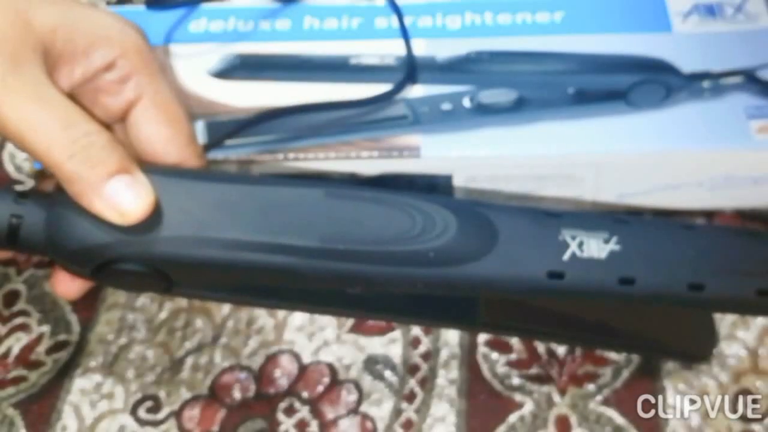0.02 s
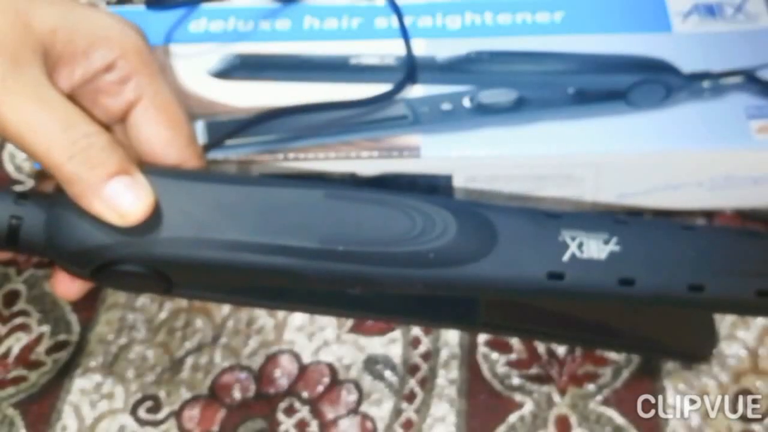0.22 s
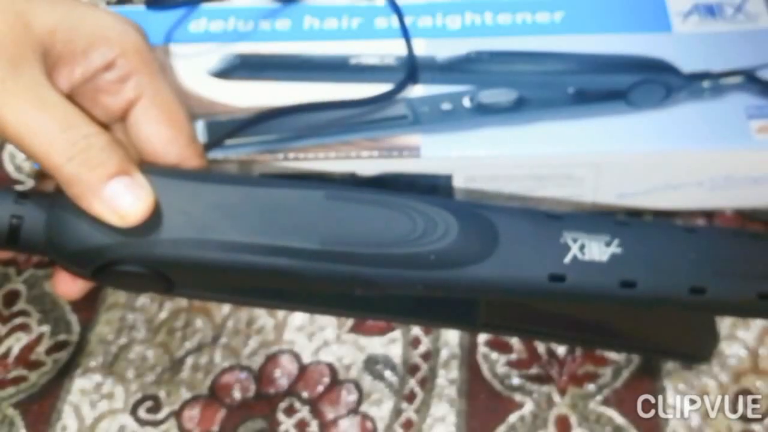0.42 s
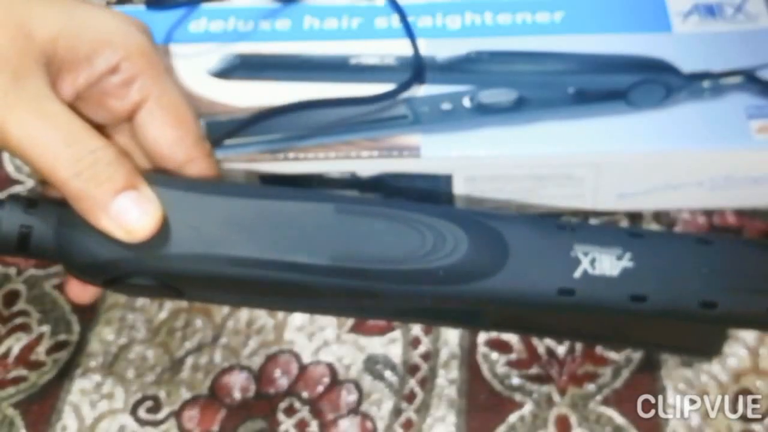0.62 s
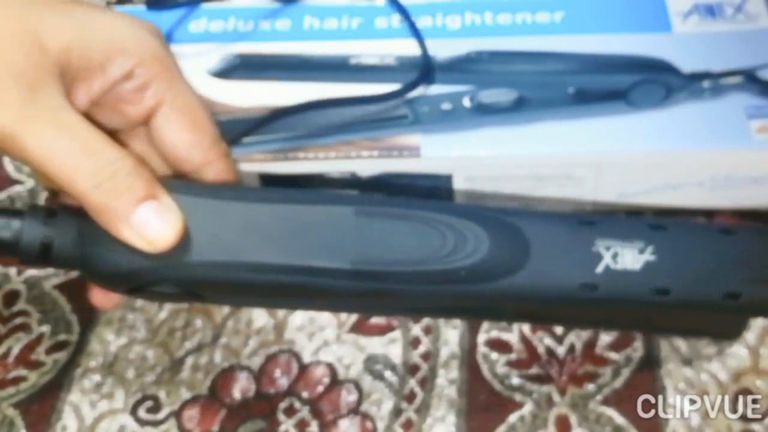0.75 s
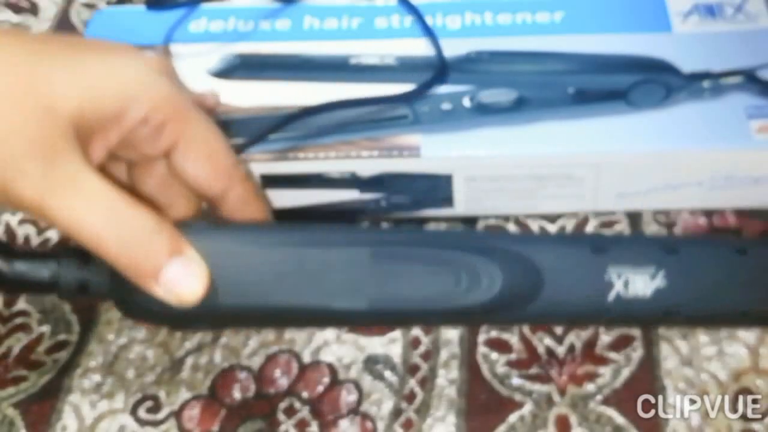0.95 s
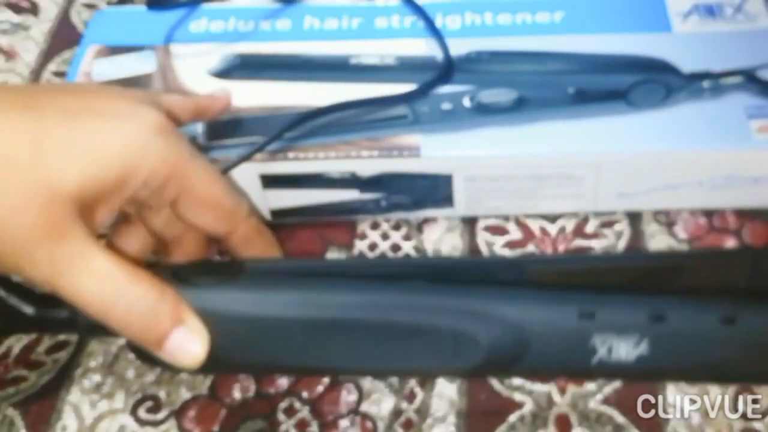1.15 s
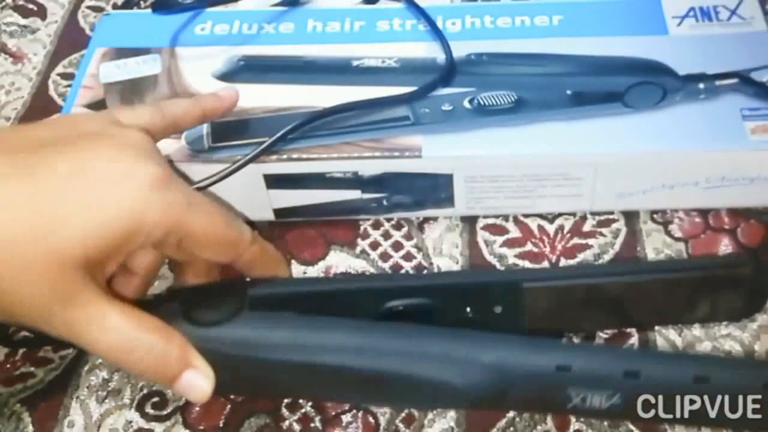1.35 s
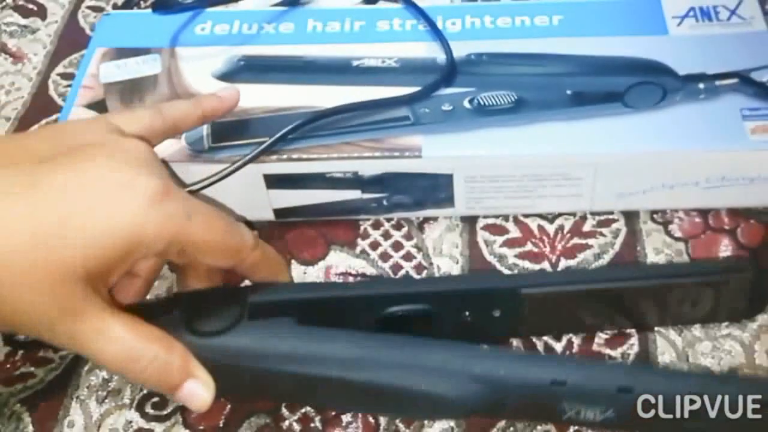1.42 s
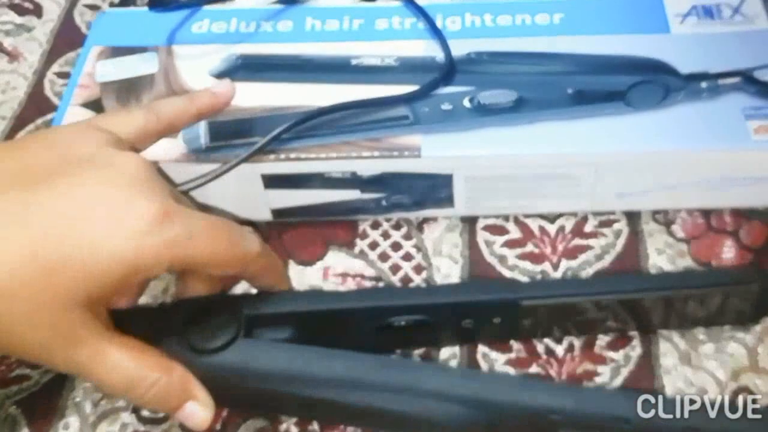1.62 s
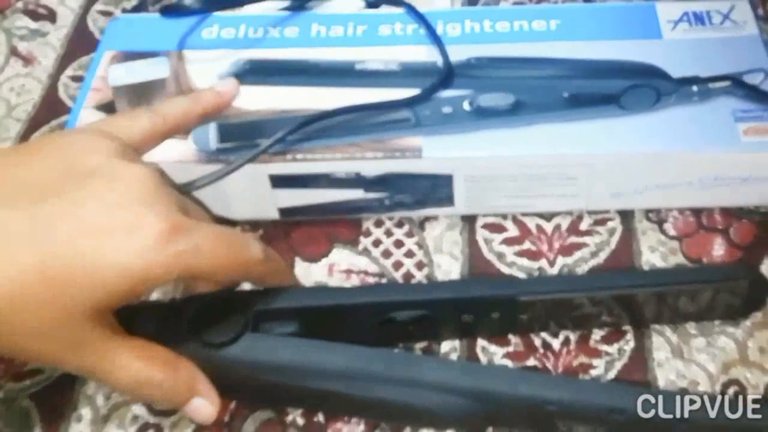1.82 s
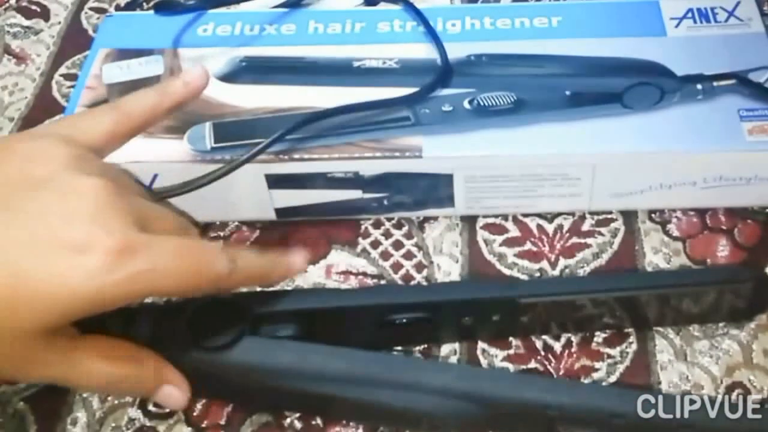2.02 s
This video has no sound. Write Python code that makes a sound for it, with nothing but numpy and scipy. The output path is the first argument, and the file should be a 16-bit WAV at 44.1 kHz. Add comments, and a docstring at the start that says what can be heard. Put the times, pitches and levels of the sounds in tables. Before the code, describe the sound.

A plastic hair straightener's catch snaps once, sharp and close, with a brief room echo. Very faint rubbing follows as the arms open, then a soft brush of fingers, over steady low rumble and hiss.

```python
"""A plastic hair straightener is handled close by in a quiet room with steady rumble and hiss.
First its hinge ticks softly, then the catch snaps once and chatters against the hollow shell.
The shell rattles briefly, then the walls answer with small echoes over a short fading tail.
Next the arms open with a faint rub while a low drone swells and fades.
Last, fingers brush softly off the casing."""
import sys
import numpy as np
from scipy import signal
from scipy.fft import rfft, irfft
from scipy.io import wavfile

SR = 44100
rng = np.random.default_rng(int(sys.argv[2]) if len(sys.argv) > 2 else 0)


def master_out(mix):
    """Clip the mix to full scale and print it as 16-bit PCM to the path in sys.argv[1]."""
    frames = np.transpose(np.atleast_2d(mix))
    ceiling = np.clip(frames, -1, 1)
    pcm = np.round(ceiling * 32767).astype(np.int16)
    wavfile.write(sys.argv[1], SR, pcm)


N = 92610

# Levels in the tables are relative. t60 is the time a sound takes to fade by 60 dB.
# the knocks that make up the snap: t/s, catch level/dB, shell level/dB
KNOCKS = [(0.244693, 6.9, -4.6), (0.24551, -12.6, -2.3), (0.246216, -14.6, -3.7), (0.247871, -36.7, -20.8)]
# ringing tones of the small stiff catch: f/Hz, level/dB, t60/s
CATCH_TONES = [(4136, -10.9, .003), (8500, 9.3, .0021), (9152, -16.7, .0054)]
# ringing tones of the hollow shell: f/Hz, level/dB, t60/s
SHELL_TONES = [(839, -44.3, .044), (968, -47.6, .018), (1143, -44.5, .02), (1302, -54.6, .065),
               (1688, -43.3, .012), (2041, -44.6, .024), (2492, -47.2, .0087), (3565, -37.2, .028),
               (5979, -44.5, .033), (6045, -45.1, .0056), (7583, -35.9, .014), (8212, -43.9, .032),
               (9866, -31, .0055), (11255, -19.2, .004), (11672, -17.2, .0128), (12240, -39.1, .018),
               (13373, -25.7, .0028), (14576, -27.8, .0022)]
# how much louder the snap is on the left: f/Hz, left minus right level/dB
SNAP_BALANCE = [(740, -4.5), (1220, -2.5), (2000, -3), (3300, 0), (5500, -1), (8800, .6), (11000, .2),
                (13000, -3.5), (15000, -1.5)]
# how far the snap's left side runs ahead of its right: f/Hz, phase/rad
SNAP_LEAD = [(1400, 0), (3200, -.2), (5400, .2), (6500, -.1), (10000, .08), (13000, -.15)]
# ringing tones of the hinge: f/Hz, level/dB, t60/s
HINGE_TONES = [(1230, -3, 0.026), (3430, 0, 0.021), (5880, -1, 0.01993), (6780, -0.5, 0.012),
               (7180, 1, 0.013), (9300, -13, .03)]
# loudness of the rub over time: t/s, lower band level/dB, upper band level/dB
RUB_LEVELS = [(.58, -96.5, -100), (.79, -85, -88), (.9, -90, -79), (1.03, -91, -81.5), (1.09, -89, -86.5),
              (1.17, -89, -82), (1.24, -89, -89), (1.39, -79, -84), (1.46, -101, -103)]
# the two bands where the rub rings: f/Hz, width/Hz
RUB_BANDS = [(2820, 74), (3120, 220)]
# tone colour of the brushing fingers: f/Hz, level/dB
FINGER_COLOUR = [(800, -16.5), (2000, 9), (2800, -4), (6000, -5), (8500, 3), (14000, -18)]
# stereo width of the brushing fingers: f/Hz, side minus mid level/dB
FINGER_WIDTH = [(700, -5.5), (4000, -11), (10000, -10)]
# a brief, soft shell rattle (first row), then early echoes off the walls: delay/s, spread/s, level/dB
RATTLE_AND_ECHOES = [(.008, .005, -50), (.0195, .003, -48), (.027, .0011, -40), (.0292, .0022, -40)]
# tone colour of the rattle and echoes: f/Hz, level/dB
RATTLE_ECHO_COLOUR = [(300, -15.5), (2000, -1), (2700, -33.5), (3350, -1), (4300, 0), (5000, -12),
                      (6300, 0.5), (8800, -4.5), (10000, 5.5), (11200, 4), (12500, -5.5), (15000, -7)]
# tone colour of the room's tail: f/Hz, level/dB
TAIL_COLOUR = [(300, -7.5), (800, 1), (1300, -1), (2000, 1), (2700, -20), (3450, 4), (4400, -1.5),
               (5400, -3), (6100, 5.5), (6800, -1.5), (8800, 4), (10600, -4), (11150, 13), (11850, 7),
               (12300, 2), (15000, -2.5)]
# how long the tail takes to fade: f/Hz, t60/s
TAIL_FADE = [(1000, 0.2), (3500, 0.22), (7000, 0.25), (11500, 0.2293), (15000, 0.13)]
# stereo width of the rattle, echoes and tail: f/Hz, side minus mid level/dB
AFTER_SNAP_WIDTH = [(1000, -6.5), (2400, -13.5), (4400, -5.5), (8000, -1), (15000, -3.5)]
# loudness of the low drone over time: t/s, level/dB
DRONE_SWELL = [(.45, -71.5), (.65, -61), (1.45, -56), (1.7, -69)]
# tone colour of the steady rumble and hiss: f/Hz, level/dB
BACKGROUND_COLOUR = [(20, -11.5), (33, -1.5), (43, -3.5), (59, 1.5), (77, -6.5), (110, -2.5), (165, -11),
                     (230, -11.5), (290, -14), (380, -18), (620, -16.5), (1030, -20.5), (1400, -28.5),
                     (2000, -32.5), (2500, -36.5), (4200, -39), (6400, -40), (7200, -37), (10000, -41),
                     (13000, -43), (14700, -48), (15300, -60)]
# stereo width of the rumble and hiss: f/Hz, side minus mid level/dB
BACKGROUND_WIDTH = [(25, -30.5), (60, -38.5), (110, -53), (200, -32.5), (380, -23.5), (700, -25.5),
                    (1300, -19), (2400, -13.5), (4400, -9), (8000, -7), (15000, -5.5)]

SNAP_S = KNOCKS[0][0]
TIME = np.arange(N) / SR  # seconds at each sample
FREQS = np.fft.rfftfreq(N, 1 / SR)  # Hz at each point of a spectrum


def catch_snap():
    """The catch snaps and chatters: each knock sets both the catch and the shell ringing."""
    snap = np.zeros(N)
    for start_s, catch_db, shell_db in KNOCKS:
        snap += gain(catch_db) * ring(CATCH_TONES, start_s, rise_s=.00207)
        snap += gain(shell_db) * ring(SHELL_TONES, start_s, rise_s=.00005)
    # the hollow shell gives off less sound in one narrow band
    dip_hz, dip_half_width_hz, dip_db = 5300, 260, -9
    hollow = gain(dip_db * bell_curve(FREQS, dip_hz, dip_half_width_hz))
    # left and right each take half of the lean and the lead, in opposite directions
    lean_db = look_up(SNAP_BALANCE, FREQS) / 2
    lead = look_up(SNAP_LEAD, FREQS) / 2
    stereo = gain([lean_db, -lean_db]) * np.exp(1j * np.array([lead, -lead]))
    return irfft(rfft(snap) * hollow * stereo, N)


def hinge_tick():
    """The hinge takes up its slack and rings softly just before the snap."""
    return gain(db=-47) * ring(HINGE_TONES, start_s=.2277, rise_s=.0013)


def arm_rub():
    """Faint friction rings in two narrow bands while the arms swing open."""
    times, *band_levels = np.transpose(RUB_LEVELS)
    return sum(noise_band(hz, width_hz, times, levels)
               for (hz, width_hz), levels in zip(RUB_BANDS, band_levels))


def finger_brush():
    """Fingers slide off the casing, making one soft swell of noise."""
    swell = bell_curve(TIME, centre=1.885, spread=.046)
    return gain(db=-73) * swell * stereo_noise(FINGER_COLOUR, FINGER_WIDTH)


def rattle_and_echoes():
    """A brief, soft rattle of the shell, then early echoes off the walls, each a burst of noise."""
    bursts = sum(gain(db) * bell_curve(TIME - SNAP_S, delay, spread)
                 for delay, spread, db in RATTLE_AND_ECHOES)
    return bursts * stereo_noise(RATTLE_ECHO_COLOUR, AFTER_SNAP_WIDTH)


def room_tail():
    """Many reflections of the snap blur into noise, each band fading at its own speed."""
    delay_s, rise_s = .003, .006
    hz, t, bands = signal.stft(stereo_noise(TAIL_COLOUR, AFTER_SNAP_WIDTH), SR, nperseg=256)
    bands = bands * fade_out(t, look_up(TAIL_FADE, hz)[:, None])
    _, tail = signal.istft(bands, SR, nperseg=256)
    tail = gain(db=-44.5) * fade_in(TIME, rise_s) * tail[:, :N]
    silence = np.zeros((2, round((SNAP_S + delay_s) * SR)))
    return np.hstack([silence, tail])[:, :N]


def background():
    """The room's steady rumble and thin hiss, with a low drone that wavers, swells and fades."""
    rumble_and_hiss = gain(db=-56) * stereo_noise(BACKGROUND_COLOUR, BACKGROUND_WIDTH)
    times, levels = np.transpose(DRONE_SWELL)
    return rumble_and_hiss + noise_band(centre_hz=114.1, width_hz=24, times=times, levels_db=levels)


def ring(tones, start_s, rise_s):
    """A struck part rings with several pure tones that build quickly and die away."""
    t = np.maximum(TIME - start_s, 0)
    return sum(gain(db) * fade_in(t, rise_s) * fade_out(t, t60) * np.sin(2 * np.pi * hz * t)
               for hz, db, t60 in tones)


def noise_band(centre_hz, width_hz, times, levels_db):
    """Noise gathered around one pitch, with a loudness that changes over time."""
    white = np.exp(2j * np.pi * rng.random(len(FREQS)))
    band = irfft(white / (1 + ((FREQS - centre_hz) / width_hz) ** 2) ** 2, N)
    return gain(np.interp(TIME, times, levels_db)) * normalise(band)


def stereo_noise(colour, width):
    """Coloured noise: both ears share the mid part, and the side part sets them apart."""
    mid, side = np.exp(2j * np.pi * rng.random((2, len(FREQS))))
    side = side * gain(look_up(width, FREQS))
    left_right = np.array([mid + side, mid - side])
    return normalise(irfft(left_right * gain(look_up(colour, FREQS)), N))


def fade_in(t, rise_s):
    """Climbs from zero towards one."""
    return 1 - np.exp(-t / rise_s)


def fade_out(t, t60):
    """Falls by 60 dB every t60 seconds."""
    return np.exp(-np.log(1000) * t / t60)


def bell_curve(x, centre, spread):
    """A smooth bump with a height of one."""
    return np.exp(-((x - centre) / spread) ** 2)


def look_up(table, hz):
    """Reads between a table's rows, with frequency spaced like musical pitch."""
    f, value = np.transpose(table)
    return np.interp(np.log(hz + 1), np.log(f), value)


def gain(db):
    """Turns decibels into a multiplier."""
    return 10 ** (np.asarray(db) / 20)


def normalise(x):
    """Scales a sound to an average power of one."""
    return x / np.sqrt(np.mean(x ** 2) + 1e-20)


def scene():
    """The tick, snap and rattle, the room's answer and faint handling, over the background."""
    clicks = hinge_tick() + catch_snap()
    after_snap = rattle_and_echoes() + room_tail()
    handling = arm_rub() + finger_brush()
    return clicks + after_snap + handling + background()


def record(dry):
    """Cuts away the very highest treble."""
    cutoff_hz = 15400
    low_pass = signal.firwin(255, cutoff_hz, window=("kaiser", 8), fs=SR)
    return signal.oaconvolve(dry, low_pass[None], "same")


dry = scene()
out = record(dry)
master_out(out)
```